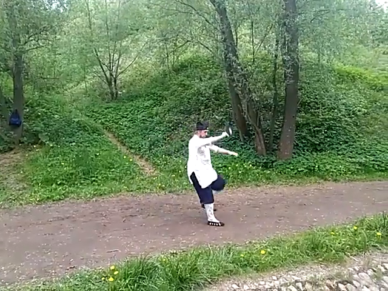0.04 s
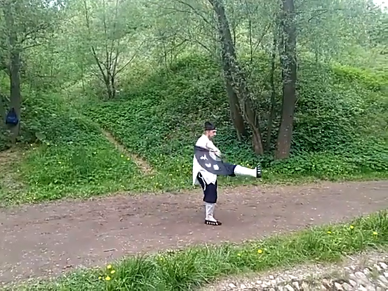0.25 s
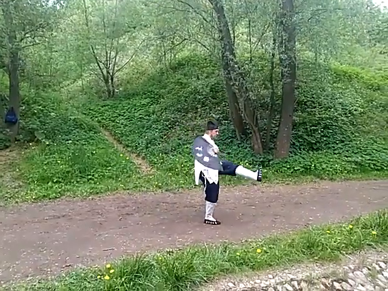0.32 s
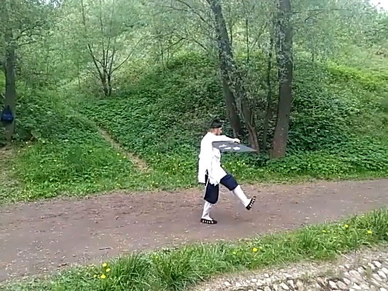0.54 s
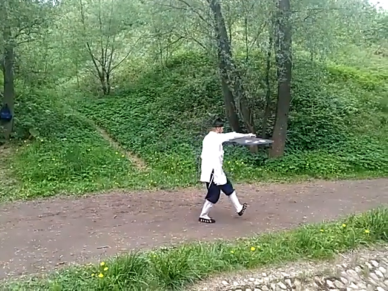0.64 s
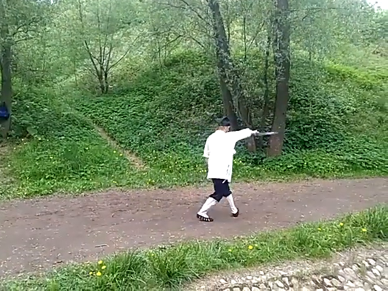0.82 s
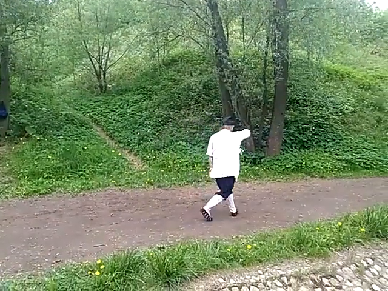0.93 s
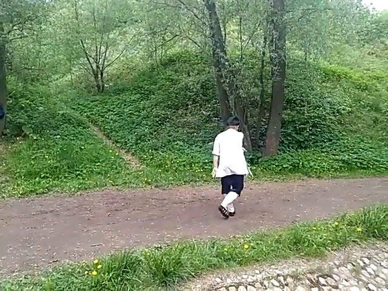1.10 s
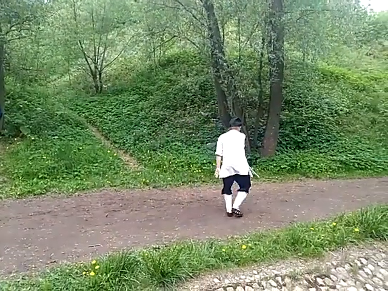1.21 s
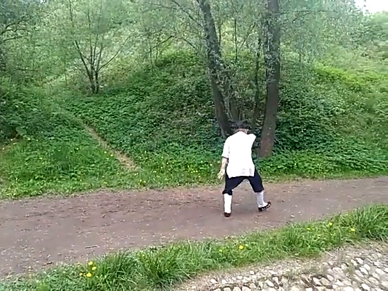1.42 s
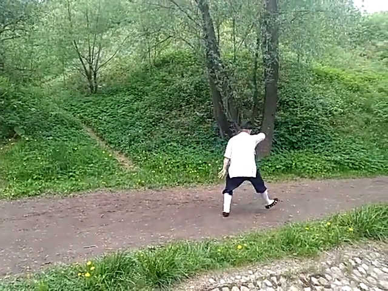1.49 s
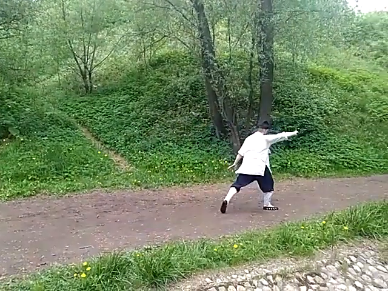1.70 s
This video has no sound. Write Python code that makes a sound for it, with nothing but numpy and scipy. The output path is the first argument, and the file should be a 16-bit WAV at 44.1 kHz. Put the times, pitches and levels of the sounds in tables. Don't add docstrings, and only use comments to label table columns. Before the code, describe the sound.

Stiff fan ribs slap open in a fast cracking burst outdoors, then faint birdsong and scuffs.

```python
import sys
import numpy as np
from scipy import signal
from scipy.io import wavfile
from scipy.ndimage import uniform_filter1d

SR = 44100
rng = np.random.default_rng(int(sys.argv[2]) if len(sys.argv) > 2 else 0)


def transcribe(u):
    v = np.clip(np.atleast_2d(u).T, -1, 1)
    q = np.round(v * 32767).astype(np.int16)
    wavfile.write(sys.argv[1], SR, q)


def linear_from_db(decibels):
    return 10 ** (np.asarray(decibels, float) / 20)


N = 77175


def at_hz(points, hz):
    table = np.array(points)
    return np.interp(np.log(hz), np.log(table[:, 0]), table[:, 1])


def rms_one(x):
    return x / np.sqrt(np.mean(x ** 2) + 1e-20)


def butter(x, order, hz, kind):
    return signal.sosfilt(signal.butter(order, hz, kind, fs=SR, output="sos"), x)


def resonance(x, hz, width_hz):
    r = np.exp(-np.pi * width_hz / SR)
    top = np.array([1, 0, -1]) * (1 - r * r) / 2
    bottom = [1, -2 * r * np.cos(2 * np.pi * hz / SR), r * r]
    return signal.lfilter(top, bottom, x + 1e-18)


def noise_band(x, hz, width_hz):
    return resonance(resonance(x, hz, width_hz), hz, width_hz)


def bands(length):
    edges = 22 * 2 ** np.arange(0, 9.6, 0.5)
    white = rng.standard_normal((2, 2, length))
    for k, (low, high) in enumerate(zip(edges, edges[1:])):
        yield np.sqrt(low * high), butter(white[k % 2], 2, [low, high], "band")


def flutter(depth, smooth):
    return 1 + depth * rms_one(signal.lfilter([1], [1, -smooth], rng.standard_normal(N)))


def swell(s, length):
    along = np.clip((np.arange(N) / SR - s) / length, 0, 1)
    return np.sin(np.pi * along) ** 0.49


def glide(s, length, start_hz, end_hz):
    along = np.clip((np.arange(N) / SR - s) / length, 0, 1)
    hz = start_hz * (end_hz / start_hz) ** along
    return swell(s, length) * np.sin(2 * np.pi * np.cumsum(hz) / SR)


# (t/s, length/s,
# level/dB, centre f/Hz, width/Hz)
SCUFF_PUFFS = [(-.05, 0.19, -51, 7000, 6030), (-.05, 0.17, -55, 1690, 2780), (0.035, 0.03, -45, 8200, 1220),
               (0.108, 0.12, -51.5, 1440, 2500), (0.121, 0.27, -49.5, 5500, 6900),
               (0.159, 0.03, -47.5, 4940, 810), (0.479, 0.14, -56, 4200, 1385),
               (0.181, 0.043, -56, 216, 200), (0.812, 0.31, -57, 4110, 1950),
               (1.274, 0.27, -55, 4070, 1910), (1.59, 0.18, -69, 196, 251), (0.81, 0.012, -53, 8260, 3000),
               (0.856, 0.023, -59, 8200, 1200), (.73, 0.37, -68, 7570, 2000), (0.958, 0.2, -62, 8200, 1520),
               (1.027, 0.028, -59, 8090, 1480), (1.06, 0.032, -65, 8200, 950),
               (1.199, 0.048, -51.5, 7800, 3500), (1.202, 0.076, -51.5, 3760, 4000),
               (1.228, 0.016, -50, 7600, 1200), (1.239, 0.087, -63, 7800, 2000),
               (1.414, .12, -65, 7400, 1950), (1.491, 0.037, -63.5, 7400, 200),
               (1.55, 0.051, -69, 7180, 200)]


def scuffs():
    lean = 0.61
    grit = rng.standard_normal((2, N))
    t = np.arange(N) / SR
    out = np.zeros((2, N))
    for s, length, db, hz, width_hz in SCUFF_PUFFS:
        along = np.clip((t - s) / length, 0, 1)
        shape = np.sin(np.pi * along ** lean) ** 0.5
        out += linear_from_db(db) * shape * rms_one(noise_band(grit, hz, width_hz))
    return out


# (f/Hz, level/dB)
AIR_COLOUR = [(59, -36), (100, -8), (758, -12.5), (870, -11.5), (1100, -14), (2420, -16.5), (4200, -10.5),
              (5210, -31), (11000, -27.5), (14300, -55), (22000, -120)]


def air():
    hiss = rms_one(sum(band * linear_from_db(at_hz(AIR_COLOUR, hz)) for hz, band in bands(N) if hz > 90))
    leaves = rms_one(noise_band(rng.standard_normal((2, N)), 8200, 1800))
    low = rng.standard_normal((2, N + SR))
    hum = rms_one(noise_band(low[0], 57, 25)[SR:])
    rumble = rms_one(noise_band(low[1], 92.1, 42)[SR:])
    return linear_from_db(-60.5) * hiss + linear_from_db(-74) * leaves + linear_from_db(-60) * hum + linear_from_db(-69) * rumble


# (t/s, clack level/dB, cloth thump level/dB, ring-down/s, brightness/dB per octave)
RIB_SLAPS = [(0.2137, -42.5, -35, 0.0023, -10), (0.2184, -43, -27, 0.013, 9), (0.224, -47, -30.5, 0.018, 5),
             (.2300, -14.5, -12.5, 0.0011, -4), (0.2318, -30.5, -18, 0.0013, 8.5),
             (0.2349, -20.5, -28.5, 0.002, -4), (.2460, -21, -18.5, 0.00204, 5),
             (.2490, -25, -18, 0.0035, -4.5), (.2600, -4, -17, 0.00036, 5), (.2617, -9.5, -14.5, .0015, 4),
             (0.2633, -18.5, -31, 0.0049, 1), (0.2742, -27, -42, 0.0035, -10.5),
             (0.283, -26.5, -34, 0.0094, 4), (0.294, -46, -28, 0.0046, 3), (.311, -38.5, -29, 0.0046, 6),
             (0.382, -41, -68, 0.0034, 11)]
# (f/Hz, width/Hz, level/dB)
RIB_RINGS = [(1600, 550, -4.5), (2500, 540, 1), (3600, 900, 2), (5600, 2650, -3.5), (7260, 1210, 3.5),
             (8570, 2450, -6)]
# (f/Hz, width/Hz, level/dB)
CLOTH_RINGS = [(252, 89, -12.5), (328, 63, -5), (496, 104.5, -2), (784, 113, -4.5), (1124, 810, -12)]


def fan():
    first_knock = 2.4
    rattle = rng.standard_normal((2, N))
    since = np.arange(SR // 8) / SR
    out = np.zeros(N)
    for s, clack_db, thump_db, ring_s, tilt_db in RIB_SLAPS:
        i = int(s * SR)
        burst = np.exp(-since / ring_s) * rattle[:, i:i + len(since)]
        burst[:, 0] = -first_knock
        ribs, cloth = np.zeros((2, len(since)))
        for k, (hz, width_hz, db) in enumerate(RIB_RINGS):
            bright_db = tilt_db * np.log2(hz / 4000)
            ribs += (-1) ** k * linear_from_db(db + bright_db) * resonance(burst[0], hz, width_hz)
        for k, (hz, width_hz, db) in enumerate(CLOTH_RINGS):
            cloth += (-1) ** k * linear_from_db(db) * resonance(burst[1], hz, width_hz)
        out[i:i + len(since)] += linear_from_db(clack_db + 7.5) * ribs + linear_from_db(thump_db + 18) * cloth
    return out


# (f/Hz, time to fall 60 dB/s)
WOOD_FADE = [(150, 0.52), (400, 0.21), (1000, 0.79), (2500, 0.77), (4300, 0.8), (7000, 0.48), (12000, 0.38)]
# (f/Hz, level/dB)
WOOD_TONE = [(150, 17.5), (500, -6), (1500, -4.5), (4000, -3), (8000, 2.5), (13000, 7.5)]


def wood_echo():
    build_s = 0.004
    t = np.arange(SR // 2 + SR // 4) / SR
    echo = np.zeros((2, len(t)))
    for hz, band in bands(len(t)):
        echo += band * linear_from_db(at_hz(WOOD_TONE, hz) - 60 * t / at_hz(WOOD_FADE, hz))
    echo *= 1 - np.exp(-t / build_s)
    return echo / np.sqrt(np.sum(echo[0] ** 2))


# (t/s, level/dB, start f/Hz, end f/Hz)
TRILL_NOTES = [(.725, -53.5, 5600, 2590), (.765, -51, 5400, 2190), (0.787, -56, 4650, 3123),
               (0.832, -54.5, 5510, 3886), (.869, -49, 5500, 1984), (.928, -55.5, 5000, 3196),
               (0.944, -53, 3600, 2220), (0.976, -50.5, 4780, 1977), (1.01, -51.5, 4740, 3600),
               (1.035, -73, 4880, 3040), (1.198, -49.5, 4963, 1600), (1.238, -53.5, 5400, 1750),
               (1.283, -53, 4500, 3920), (1.311, -55, 5270, 2154), (1.346, -51.5, 5400, 1914),
               (1.386, -67, 4800, 3930), (1.405, -48, 4900, 3175), (1.451, -51, 5282, 1482),
               (1.475, -55, 5190, 3810), (1.505, -56, 5000, 3370)]


def trill():
    note_s, upper_hz, upper_db = 0.024, 5920, -9
    scatter_s, tail_s, tail_db = 0.008, 0.086, -16
    breath = flutter(0.86, 0.9)
    t = np.arange(SR // 5) / SR
    fade = np.exp(-t / scatter_s) + linear_from_db(tail_db) * np.exp(-t / tail_s)
    leaves = rng.standard_normal((len(TRILL_NOTES), len(t))) * fade
    leaves /= np.sqrt(np.sum(leaves[0] ** 2))
    out = np.zeros(N + SR)
    for (s, db, start_hz, end_hz), leaf in zip(TRILL_NOTES, leaves):
        note = glide(s, note_s, start_hz, end_hz)
        note += linear_from_db(upper_db) * glide(s, note_s, upper_hz, 0.85 * upper_hz)
        i = int(s * SR)
        heard = signal.fftconvolve(linear_from_db(db) * (breath * note)[i:i + SR // 20], leaf)
        out[i:i + len(heard)] += heard
    return out[:N]


# (t/s, length/s, level/dB, start f/Hz, end f/Hz)
CLUCK_NOTES = [
    (1.594, 0.016, -45.5, 1450, 1640),
    (1.6134, 0.0079, -38.5, 2500, 1840),
    (1.6214, 0.0074, -40, 1850, 1520),
    (1.627, .01, -54, 1500, 970),
]


def clucks():
    out = np.zeros(N)
    for s, length, db, start_hz, end_hz in CLUCK_NOTES:
        out += linear_from_db(db + 1) * swell(s, length) * glide(s, length, start_hz, end_hz)
    return flutter(0.26, 0.95) * out


def scene():
    snap, song, cluck = fan(), trill(), clucks()
    to_wood = linear_from_db(-9.5) * snap + linear_from_db(-3) * song + linear_from_db(2) * cluck
    echo = signal.fftconvolve(to_wood[None], wood_echo(), axes=1)[:, :N]
    mid, side = echo + scuffs() + air()
    mid = mid + snap + linear_from_db(0.5) * song + cluck
    side = linear_from_db(-9) * butter(side, 6, 5850, "high")
    return np.array([mid + side, mid - side])


def roll_off(x):
    return signal.sosfilt(signal.butter(12, 16380, fs=SR, output="sos"), x)


def record(dry):
    peak_top = 1.5
    mic = butter(dry, 3, 8580, "low")
    mic = butter(mic, 2, 40.2, "high")
    hiss = butter(rng.standard_normal((2, N)), 4, 7000, "high")
    self_hiss = hiss[0] + 0.5 * hiss[1] * [[1], [-1]]
    mic = peak_top * np.tanh(mic / peak_top) + linear_from_db(-76.5) * self_hiss
    mic = signal.sosfilt(signal.ellip(10, 0.5, 70, 16200, fs=SR, output="sos"), mic)
    dull = signal.sosfiltfilt(signal.ellip(8, 0.3, 40, 14200, fs=SR, output="sos"), mic)
    leak = linear_from_db(6) * uniform_filter1d(np.abs(mic), size=128)
    return roll_off(dull + leak * (mic - dull))


dry = scene()
out = record(dry)
transcribe(out)
```